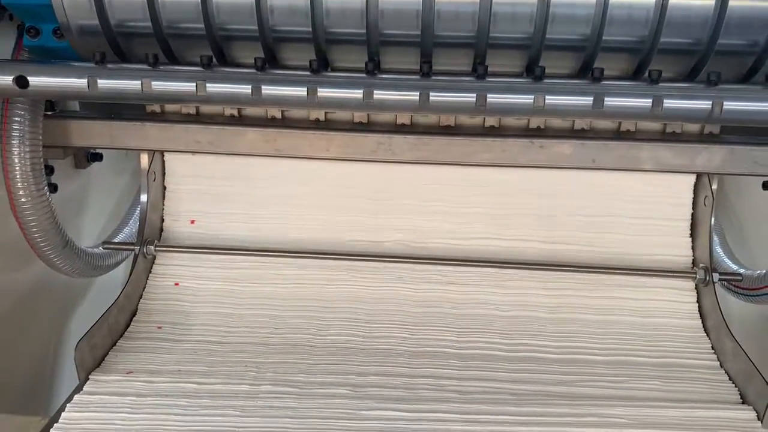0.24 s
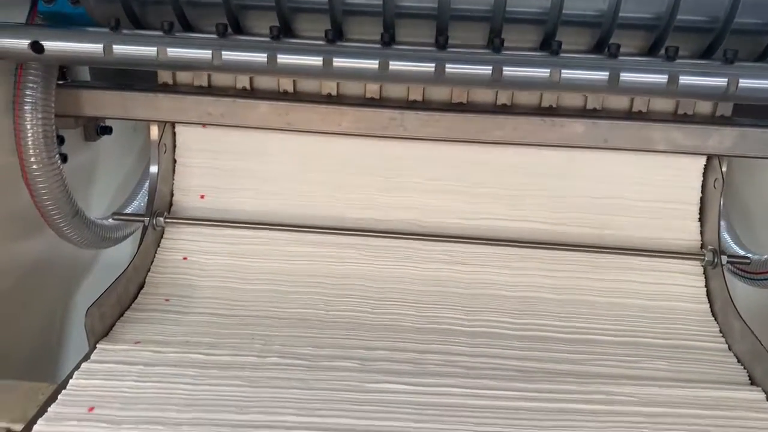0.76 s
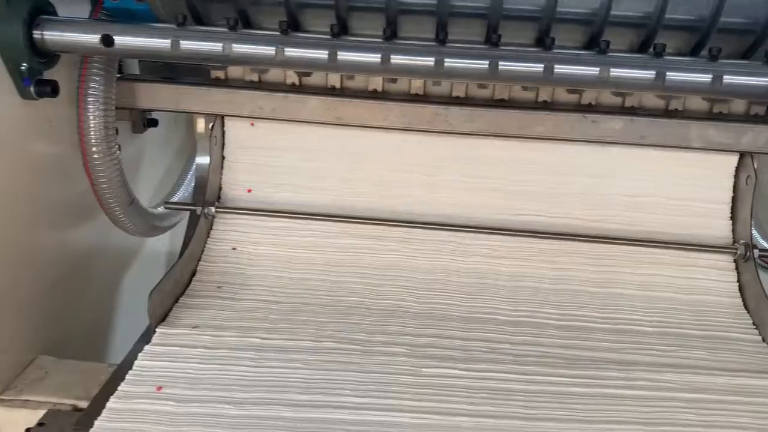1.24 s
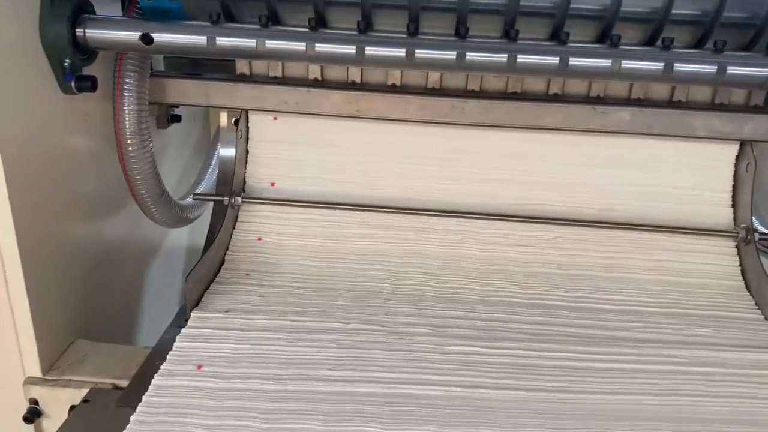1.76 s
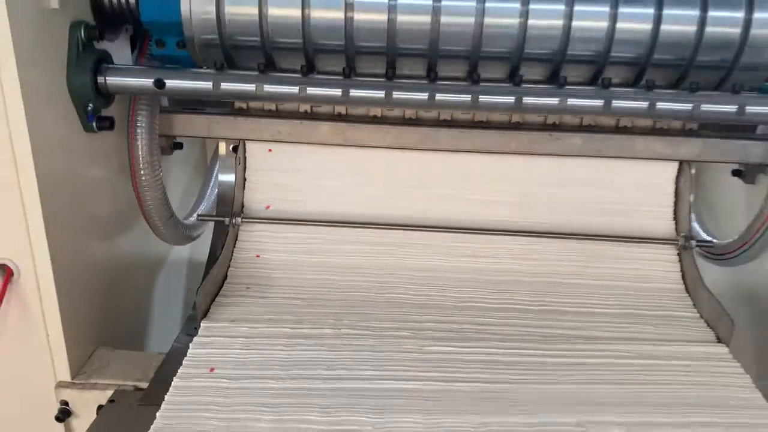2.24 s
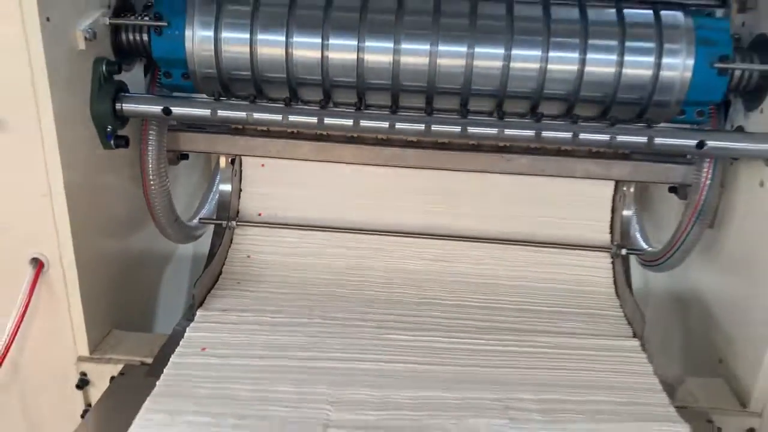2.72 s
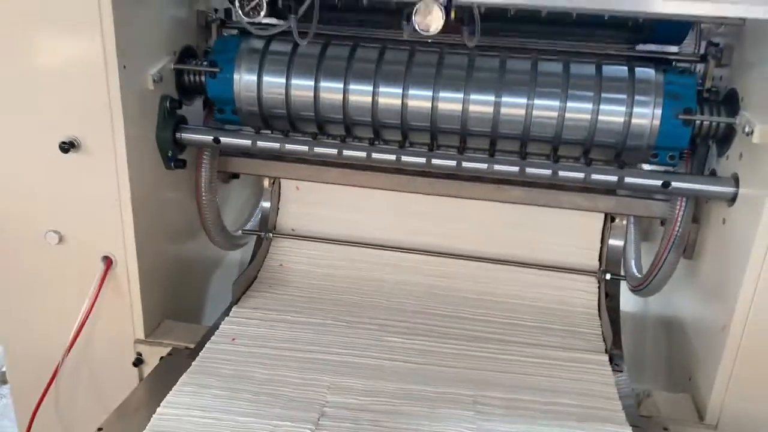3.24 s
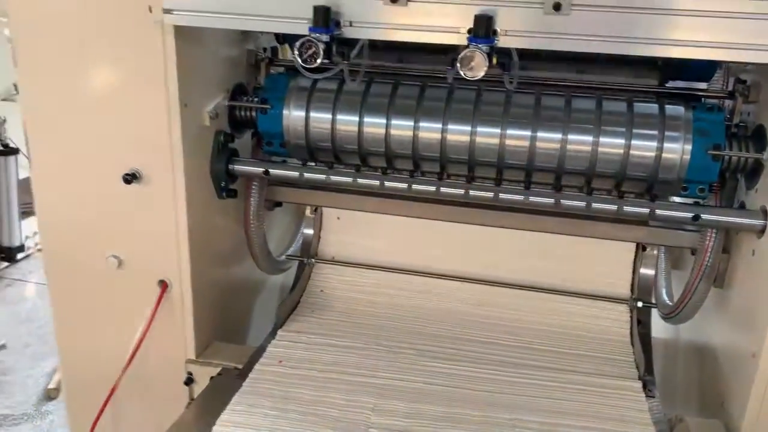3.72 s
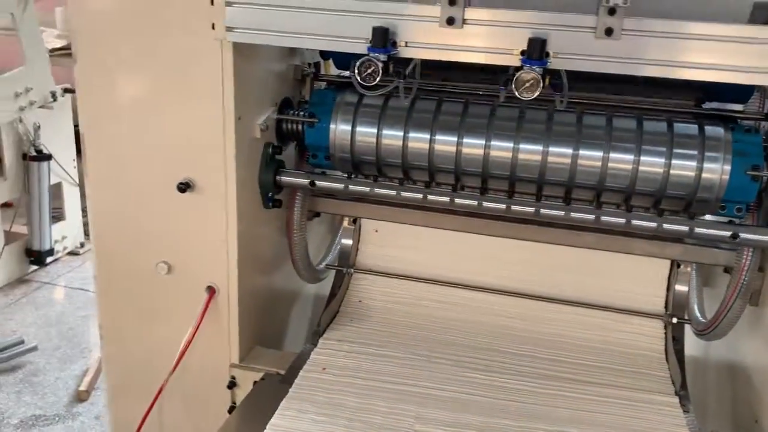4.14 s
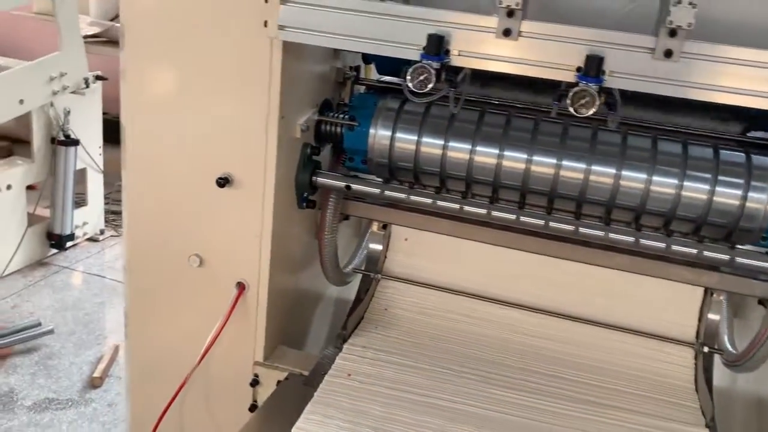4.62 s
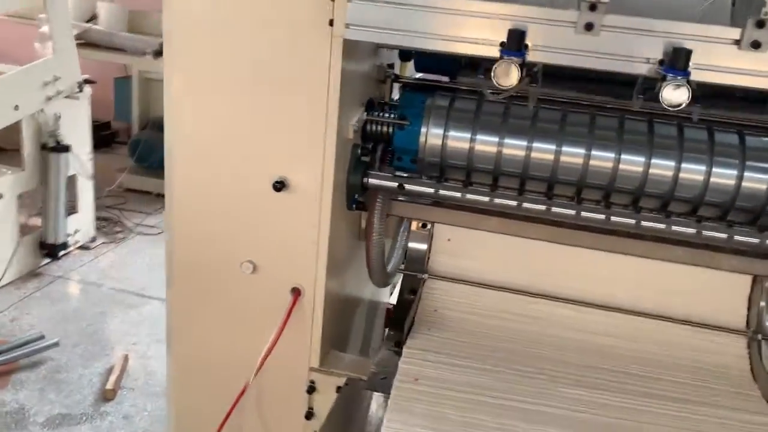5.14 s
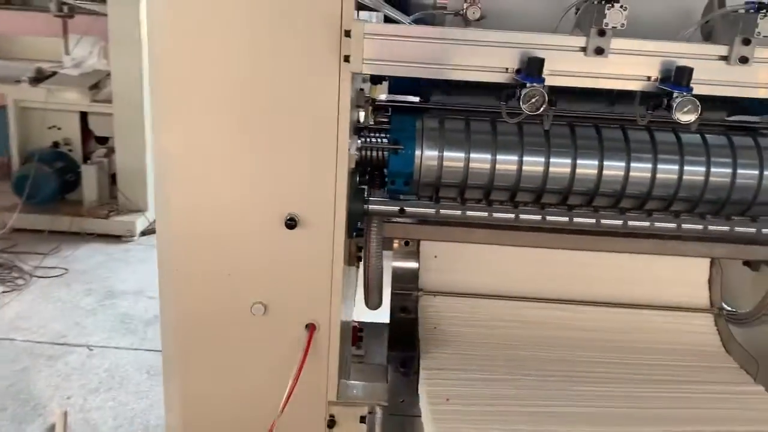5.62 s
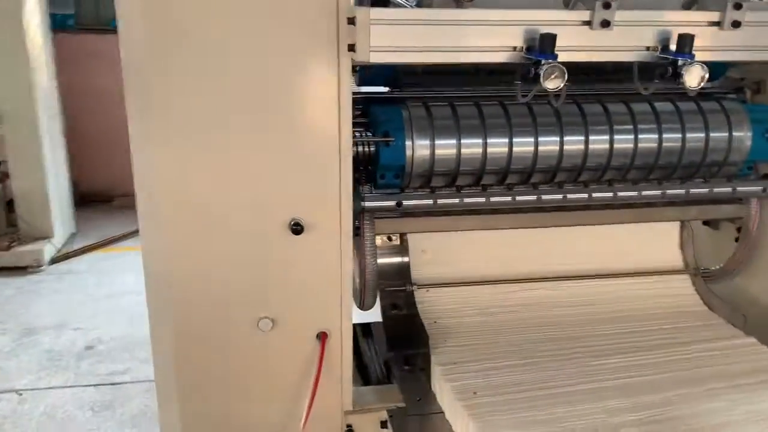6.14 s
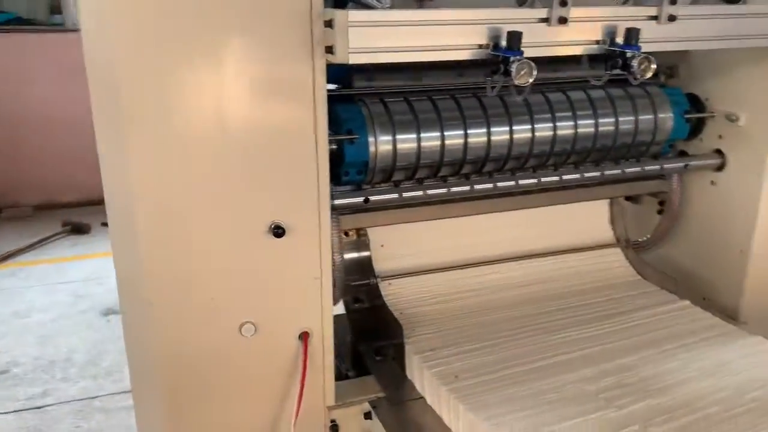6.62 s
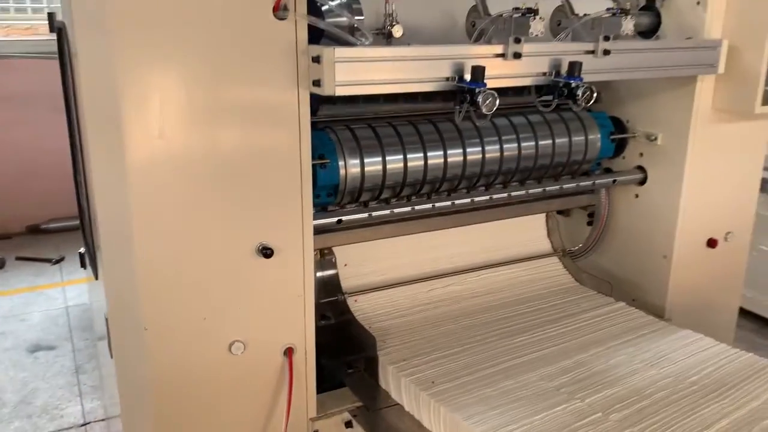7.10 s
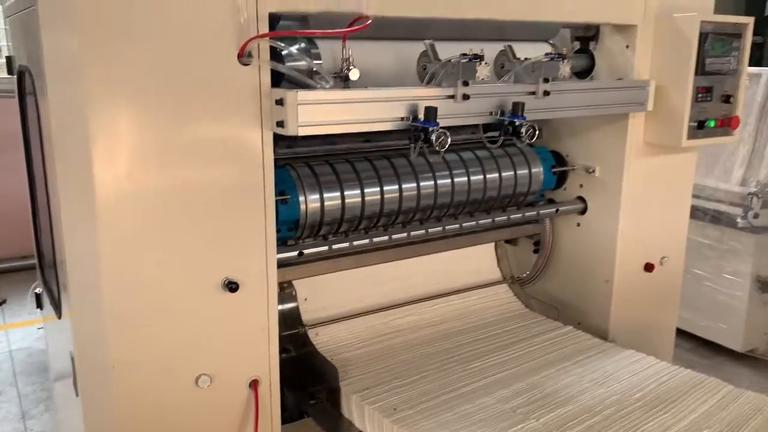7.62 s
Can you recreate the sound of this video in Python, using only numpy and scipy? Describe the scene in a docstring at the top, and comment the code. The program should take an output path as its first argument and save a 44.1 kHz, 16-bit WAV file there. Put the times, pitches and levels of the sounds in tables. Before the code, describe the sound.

A paper-folding machine clatters at nine beats a second, each fold a low thump and airy pop, over a pump drone, slowly receding.

```python
"""Paper towel folder, backing away

A folding machine runs at nine folds a second in a hard-walled workshop; the stereo listener backs away from it.
Each fold thumps the frame (gliding sine blows into resonators), and a suction valve pops (likewise)
with a puff of air (shaped noise); one of three blades clinks (struck modes).
Loose parts knock and sheets snap over a pump drone (sines), panel rumble, gear clatter and paper rush (noise).
"""
import sys
import numpy as np
from scipy import signal
from scipy.fft import rfft, irfft
from scipy.io import wavfile
from scipy.ndimage import uniform_filter1d

SR = 44100
rng = np.random.default_rng(int(sys.argv[2]) if len(sys.argv) > 2 else 0)


def wrap_up_sound(samples):
    """Save the sound to the file named by the first command line argument, as 16-bit audio."""
    columns = np.atleast_2d(samples).T
    # keep every value between -1 and 1, then stretch to whole-number steps
    tamed = np.clip(columns, -1, 1)
    steps = np.round(tamed * 32767).astype(np.int16)
    wavfile.write(sys.argv[1], SR, steps)


N = 346626
TIME = np.arange(N) / SR
HZ = np.fft.rfftfreq(N, 1 / SR)

# All levels are relative: each source sets its own gain on top.
# Place: reverberation of the workshop: f/Hz, t60/s
ROOM_T60 = [(100, 0.13), (1000, 0.071), (4000, 0.15), (10000, 0.055)]
# Distance, as the listener backs away: t/s, frame level/dB, gear clatter level/dB, paper and air level/dB,
# valve level/dB
DISTANCE = [(0.4, -16, -26.5, -34.7, 0), (1.8, -16.2, -27.2, -36.5, -.5), (3, -17.8, -27.6, -41, -4.5),
            (4.4, -19, -28, -42.3, -6), (5.7, -20, -26.7, -41, -7), (6.5, -22.5, -27.7, -41, -7.5),
            (7.8, -24, -28.5, -42, -9)]
# Stereo image: likeness of left and right by frequency, negative where opposite: f/Hz, share (clipped to +-1)
STEREO_LIKENESS = [(60, 0.92), (300, 0.85), (550, 0.3), (850, -0.41), (1100, 0.099), (1600, 0.15),
                   (2300, 0.71), (3100, -0.44), (4300, 0.42), (5600, -0.43), (6400, 0.26), (7400, -1.09),
                   (8900, 1), (9900, 0.65), (10800, -1.02)]
# Microphones: left over right: f/Hz, level/dB
LEFT_OVER_RIGHT = [(300, 0.5), (650, -3), (1400, -3), (2600, -1), (5000, -4), (9000, 1)]

# Pump's strongest tones, swelling in the room's standing waves:
# t/s, 4th order level/dB, 7th order level/dB, 10th order level/dB
PUMP_TONES = [(0.2, -43, -48, -58), (2.4, -43, -43, -54), (3.1, -31.5, -31.5, -50), (4.6, -29, -36, -49),
              (5.3, -29, -43, -38), (6.1, -35, -37, -40.5), (7, -35, -34, -47)]
# Pump's whine, its 13th order, which comes and goes: t/s, level/dB
PUMP_WHINE = [(0.2, -47), (1.4, -50), (2.6, -55), (3.05, -43), (4.2, -56), (5, -38), (5.3, -53),
              (5.7, -36.5), (6.3, -53), (6.8, -40), (7.5, -50)]
# Pump's weaker tones: multiple of the pump rate, level/dB
PUMP_ORDERS = [(2, -35), (6, -46), (8, -47), (9, -47), (12, -48)]

# Noise spectrum of the shuddering panels: f/Hz, level/dB per Hz
RUMBLE_SPECTRUM = [(15, -16), (35, -43), (55, -21), (105, -4), (145, -5), (185, -1), (260, -12),
                   (305, -2.5), (360, -21), (450, -21.5), (700, -37), (2000, -40)]
# Noise spectrum of paper on the rollers: f/Hz, level/dB per Hz
PAPER_SPECTRUM = [(1000, -1), (2500, 13.5), (3500, -11), (4400, 8), (5600, 3), (6500, 3.5), (7500, 1),
                  (8400, 1.5), (10000, -1), (11000, 4.5)]
# Noise spectrum of air from the suction holes: f/Hz, level/dB per Hz
AIR_SPECTRUM = [(800, -2), (2500, 3), (4400, 0.5), (5600, -9.5), (6500, -9.5), (7500, -7.5), (8400, -3),
                (10000, -4.5), (11000, -4)]
# Noise spectrum of gears and bearings: f/Hz, level/dB per Hz
CLATTER_SPECTRUM = [(150, 7), (400, 6.5), (480, -0.5), (555, 8.5), (680, 0), (850, -1), (1050, -2.5),
                    (1450, -6), (1800, -9), (2300, -10.5), (2680, -5.5), (2900, -8.5), (3150, -9.5),
                    (4500, -21), (9000, -44.5)]

# Sheets that snap taut: t/s, level/dB
SNAPS = [(0.502, -24), (0.56, -39), (0.845, -18.5), (2.455, -26), (2.562, -26), (2.788, -29),
         (3.871, -22.5)]
# Loudest knocks of loose parts: t/s, level/dB, strongest around f/Hz, chatter decay t/s
KNOCKS = [(0.526, -2, 720, .005), (0.859, -6.5, 850, .005), (1.167, -7, 560, .003), (1.287, -12, 1000, .01),
          (1.301, -8, 1100, .0054), (2.397, -12, 900, .0043), (2.494, -16, 1200, .0069),
          (3.186, -10, 1350, .004), (3.873, -7, 1300, .003), (4.196, -7, 900, .002),
          (4.863, -11, 850, .002), (5.33, -2, 580, .002), (5.534, -12, 800, .0045), (5.755, -9, 850, .002),
          (5.86, -13, 1350, .006), (6.194, -13, 1300, .005), (6.211, -7, 1650, .006)]
# Modes of the loose parts: f/Hz, level/dB, t60/s
PART_MODES = [(560, -1, .025), (660, -2, .02), (780, -1, .02), (950, -2, .018), (1100, -2, .015),
              (1290, 0, .015), (1480, 0, .015), (1680, -1, .012), (2280, -4, .01), (3300, -11, .01),
              (4400, -14, .01)]

# Strikes of the two harder-set blades: t/s, level/dB
HARD_BLADE_STRIKES = [(0.005, -14.5), (0.118, -14.5), (0.340, -23), (0.453, -12), (0.675, -20),
                      (0.784, -14.5), (1.009, -18), (1.118, -14.5), (1.343, -18), (1.456, -15.5),
                      (1.679, -24), (1.791, -15), (2.015, -18), (2.125, -14.5), (2.347, -24), (2.462, -17),
                      (2.684, -17), (2.795, -12.5), (3.021, -19.5), (3.133, -14), (3.356, -19),
                      (3.464, -15.5), (3.696, -21), (3.8, -18.5), (4.021, -23), (4.135, -14.5), (4.36, -19),
                      (4.470, -14), (4.695, -17.5), (4.805, -13.5), (5.028, -20.5), (5.143, -16),
                      (5.366, -19), (5.476, -16.5), (5.696, -19), (5.811, -10.5), (6.033, -17.5),
                      (6.145, -16), (6.37, -28), (6.479, -17), (6.815, -20.5), (7.15, -20), (7.378, -26),
                      (7.485, -20.5), (7.822, -23)]
# Softest blade, clearest from beside the roller until the side cover hides it: t/s, level/dB
SOFT_BLADE = [(2.5, -28.5), (4.4, -30), (5.9, -31.5), (6.5, -49), (7.6, -45)]
# Modes of a blade, main ring first: f/Hz, level/dB, t60/s
BLADE_MODES = [(2665, 0, .021), (2270, 0, .018), (2420, 1.5, .018), (2560, -2, .018), (2790, -2, .018),
               (2895, -9, .04), (3350, -6, .012), (3800, -6, .012), (4350, -8, .01)]
# A blade's strike and rebounds: delay t/s, level/dB
REBOUNDS = [(0, 0), (.003, -4), (.008, -13)]

# Folding arms' blows within a fold:
# delay t/s, level/dB, starting f/Hz, final f/Hz, time of the pitch fall t/s, time to the peak t/s
ARM_BLOWS = [(-.002, -18, 440, 360, .004, .0028), (-.002, -8, 518, 162, .0026, .007),
             (.0288, -17, 210, 190, .005, .003)]
# Suction valve's click, then its pop:
# delay t/s, level/dB, starting f/Hz, final f/Hz, time of the pitch fall t/s, time to the peak t/s
VALVE_BLOWS = [(.0531, -18, 600, 150, .0026, .009), (.0647, -9, 120, 83, .0026, .0052)]
# Resonances of the frame: f/Hz, width f/Hz, level/dB
FRAME_MODES = [(54.4, 8.3, -5), (138.6, 8.6, 10), (209, 16, -4.4), (309.3, 38.6, 7.5), (422, 8.4, 7)]

FOLD_HZ, FIRST_FOLD_S = 8.96, .0437
HUNT_S, HUNT_HZ = .0006, .578  # the drive hunts: folds come slightly early and late
BLADES = 3  # blades on the cutting roller, one for each fold, set unequally hard
POP_DELAY_S, BLADE_DELAY_S = .0675, .0725  # after the start of a fold
THUMP_VARY_DB, POP_VARY_DB, BLADE_VARY_DB = .4, 1, 1  # scatter from fold to fold
PLAY_S = .00015  # timing scatter of each blow
FRAME_LAG_S = .00034  # the frame reaches the left microphone later
PUMP_HZ = 77.62
PUMP_FADE_DB, PUMP_FLUTTER_DB, PUMP_FLUTTER_HZ = 2.5, 1.6, 4
# A lighter knock once in each turn of the roller
RATTLE_DELAY_S, RATTLE_SCATTER_S, RATTLE_DB, RATTLE_VARY_DB = .137, .008, -19, 2
RATTLE_HZ, RATTLE_CHATTER_S = 1100, .0066
KNOCK_FOCUS_DB = -8  # a mode one octave off the knock's strongest pitch
EDGE_HZ = 10900  # upper band limit


def amp(db):
    """Decibels to gain."""
    return 10 ** (np.asarray(db) / 20)


def unit(x):
    """Scales to an rms of 1."""
    return x / np.sqrt(np.mean(x ** 2) + 1e-20)


def read(points, hz):
    """A spectrum joined by straight lines on a log-frequency axis."""
    f, value = np.transpose(points)
    return np.interp(np.log(hz + 1), np.log(f), value)


def curves(rows):
    """Every column of a timed table, sample by sample."""
    s, *columns = np.transpose(rows)
    return [np.interp(TIME, s, c) for c in columns]


def add(mix, s, sound):
    """Mixes a sound in at the given time."""
    part = mix[..., max(round(s * SR), 0):][..., :sound.shape[-1]]
    part += sound[..., :part.shape[-1]]


def wander(hz):
    """Slow random drift of unit rms, up to about the given rate."""
    return unit(irfft(rfft(rng.standard_normal(N)) / (1 + (HZ / hz) ** 4), N))


def frame_db(falloff):
    """Level of a frame sound as the listener backs away, 0 dB at the nearest."""
    near = curves(DISTANCE)[0]
    return falloff * (near - near.max())


def spread(pair):
    """Gives two unrelated signals the set left-right likeness at each frequency."""
    a, b = rfft(pair)
    same = np.clip(read(STEREO_LIKENESS, HZ), -1, 1)
    right = same * a + np.sqrt(1 - same ** 2) * b
    return irfft(np.array([a, right]), N)


def colour(pair, spectrum, patchy_db):
    """Gives a stereo pair its spectrum, with brief patches that come and go."""
    hz, _, z = signal.stft(spread(pair), SR, nperseg=1024, noverlap=768)
    patches = uniform_filter1d(rng.standard_normal(z.shape[1:]), size=7, axis=0)  # across frequency
    patches = unit(uniform_filter1d(patches, size=4, axis=1))  # across time
    z = z * amp(read(spectrum, hz)[:, None] + patchy_db * patches)
    return unit(signal.istft(z, SR, nperseg=1024, noverlap=768)[1][:, :N])


def noise(spectrum, patchy_db):
    """Stereo noise of the given spectrum."""
    return colour(rng.standard_normal((2, N)), spectrum, patchy_db)


def folds():
    """The start of every fold (s), swinging with the drive."""
    even = np.arange(FIRST_FOLD_S, N / SR, 1 / FOLD_HZ)
    return even + HUNT_S * np.cos(2 * np.pi * HUNT_HZ * (even - FIRST_FOLD_S))


def each_fold(delay, rise, fall, vary_db):
    """An envelope that swells and dies once in every fold (times in s)."""
    t, out = np.arange(SR // 5) / SR, np.zeros(N)
    shape = (1 - np.exp(-(t / rise) ** 2)) * np.exp(-t / fall)
    shape = shape / shape.max()
    for s in folds():
        add(out, s + delay, amp(vary_db * rng.standard_normal()) * shape)
    return out


def ring(modes, contact, onset_s=.00088):
    """A contact rings a set of decaying modes; its loudest moment has a short-term rms of 1."""
    t = np.arange(SR // 10) / SR
    hz, db, t60 = np.transpose(modes)[:, :, None]
    phase = rng.random(hz.shape)
    body = (amp(db - 60 * t / t60) * np.sin(2 * np.pi * (hz * t + phase))).sum(0)
    body *= 1 - np.exp(-t / onset_s)
    out = signal.fftconvolve(contact, body[None], axes=1)[:, :len(t)]
    loudest = uniform_filter1d(out ** 2, size=256, axis=1).max(1, keepdims=True)
    return out / np.sqrt(loudest)


def room(x):
    """Workshop walls return sparse reflections, each band dying at its own speed."""
    taps = rng.choice([-1., 1.], (2, SR // 2))
    taps *= rng.random((2, SR // 2)) < 2500 / SR  # about 2500 reflections a second
    taps[:, :round(.004 * SR)] = 0  # gap before the first one
    hz, t, z = signal.stft(taps, SR, nperseg=256)
    tail = signal.istft(z * amp(-60 * t / read(ROOM_T60, hz)[:, None]), SR)[1]
    return signal.fftconvolve(x, tail / np.linalg.norm(tail[0]), axes=1)[:, :N]


def pump(port_turns=.05):
    """The vacuum pump drones in multiples of its rate; each tone flutters on its own as the listener moves."""
    turns = np.cumsum(PUMP_HZ + .04 * wander(1) + .12 * wander(6)) / SR
    tones = list(zip((4, 7, 10, 13), curves(PUMP_TONES) + curves(PUMP_WHINE)))
    tones += [(k, db + PUMP_FADE_DB * wander(1.0)) for k, db in PUMP_ORDERS]
    out = np.zeros((2, N))
    for k, db in tones:
        # the phase drifts oppositely on the left and right
        apart = port_turns * k / 10 * wander(.11) * np.array([[-.5], [.5]])
        level = np.sqrt(2) * amp(db + PUMP_FLUTTER_DB * wander(PUMP_FLUTTER_HZ))
        out += level * np.sin(2 * np.pi * (k * turns + rng.random() + apart))
    return out


def rumble(rumble_db=-24.5, falloff=.65):
    """Side panels shudder after each thump: low noise swelling over a steady floor."""
    shudder = 1.8 + each_fold(delay=0., rise=.002, fall=.016, vary_db=.5)
    panels = unit(noise(RUMBLE_SPECTRUM, patchy_db=2.0) * shudder)
    return amp(frame_db(falloff) + rumble_db) * panels


def paper_and_air(paper_db=7.5, air_db=2.0, steady=1.7):
    """Paper slides and flaps over the rollers; the suction holes puff as they let a sheet go."""
    feed = each_fold(delay=-.005, rise=.008, fall=.024, vary_db=1)
    release = each_fold(delay=POP_DELAY_S - .012, rise=.012, fall=.012, vary_db=.8)
    peel = each_fold(delay=POP_DELAY_S, rise=.007, fall=.006, vary_db=1)
    paper = amp(paper_db) * unit(noise(PAPER_SPECTRUM, patchy_db=4.0) * (steady + feed))
    air = amp(air_db) * unit(noise(AIR_SPECTRUM, patchy_db=2.5) * (release + .5 * peel))
    return amp(curves(DISTANCE)[2]) * (paper + air)


def clatter(clatter_db=7.0, per_s=800, size_db=1.0, rush=.39, steady=4):
    """Gears and bearings tick densely, hardest while the arms swing back."""
    size = amp(size_db * np.minimum(rng.exponential(1, N), np.pi))
    ticks = size * (rng.random(N) < per_s / SR) * rng.choice([-1, 1], (2, N))
    drive = ticks + rush * rng.standard_normal((2, N))
    load = steady + each_fold(delay=.0011, rise=.0049, fall=.013, vary_db=5.5)
    return amp(curves(DISTANCE)[1] + clatter_db) * colour(drive * load, CLATTER_SPECTRUM, patchy_db=3.0)


def snaps(snap_db=0, fall_s=.013):
    """Now and then a sheet snaps taut: a short, bright burst of paper noise."""
    t, burst = np.arange(SR // 10) / SR, np.zeros(N)
    for s, db in SNAPS:
        add(burst, s, amp(db + snap_db) * np.exp(-t / fall_s))
    return burst * noise(PAPER_SPECTRUM, patchy_db=3)


def knocks(knock_db=-10.5):
    """Loose parts rattle with each turn of the roller and sometimes knock hard, some dull and some bright."""
    out, t = np.zeros((2, N)), np.arange(SR // 10) / SR
    rattles = []
    for s in folds()[::BLADES]:
        at = s + rng.normal(RATTLE_DELAY_S, RATTLE_SCATTER_S)
        db = RATTLE_DB + RATTLE_VARY_DB * rng.standard_normal()
        rattles.append((at, db, RATTLE_HZ, RATTLE_CHATTER_S))
    for s, db, centre, chatter in KNOCKS + rattles:
        modes = [(hz, level + KNOCK_FOCUS_DB * np.log2(hz / centre) ** 2, t60)
                 for hz, level, t60 in PART_MODES]
        contact = rng.standard_normal((2, len(t))) * np.exp(-t / chatter)
        add(out, s - .001, amp(db + knock_db) * ring(modes, contact))
    return out


def clink(side_db, scrape_db=-25, scrape_s=.012):
    """A blade strikes, scrapes and rebounds; side_db sets its side modes against its main ring."""
    t = np.arange(SR // 20) / SR
    contact = amp(scrape_db) * rng.standard_normal((2, len(t))) * np.exp(-t / scrape_s)
    for delay, db in REBOUNDS:
        at = delay * rng.uniform(.8, 1.2) + rng.uniform(0, .00015, 2)  # one time for each side
        contact[[0, 1], np.round(at * SR).astype(int)] += amp(db)
    modes = [(hz, db + side_db * (k > 0) + 2 * rng.standard_normal(), t60)
             for k, (hz, db, t60) in enumerate(BLADE_MODES)]
    return ring(modes, contact, onset_s=.0022)


def blade(hard_db=-5.8, side_falloff=1.1):
    """The three blades take turns to meet the anvil; from afar their main ring stands out."""
    out, side = np.zeros((2, N)), frame_db(side_falloff)
    strikes = [(s, db + hard_db) for s, db in HARD_BLADE_STRIKES]
    for s in folds()[1::BLADES]:
        soft_db = np.interp(s, *np.transpose(SOFT_BLADE)) + BLADE_VARY_DB * rng.standard_normal()
        strikes.append((s + BLADE_DELAY_S, soft_db))
    for s, db in strikes:
        add(out, s, amp(db) * clink(np.interp(s, TIME, side)))
    return out


def bend(start_hz, end_hz, sag_s, peak_s):
    """A blow on steel: fast bending waves arrive first, so the pitch falls as the thud swells and dies."""
    t = np.arange(SR // 10) / SR
    turns = end_hz * t + (start_hz - end_hz) * sag_s * (1 - np.exp(-t / sag_s))
    swell = (t / peak_s * np.exp(1 - t / peak_s)) ** 2
    return -swell * np.sin(2 * np.pi * turns)


def thumps(thump_db=0., valve_db=0., thump_falloff=.96, valve_falloff=1.2):
    """The arms, with a little play, and the valve strike the frame, which hums on from fold to fold."""
    force = np.zeros(N)
    arm_level = thump_db + frame_db(thump_falloff)
    valve_level = valve_db + valve_falloff * curves(DISTANCE)[3]
    parts = [(ARM_BLOWS, arm_level, THUMP_VARY_DB), (VALVE_BLOWS, valve_level, POP_VARY_DB)]
    for blows, level, vary_db in parts:
        for s, near in zip(folds(), np.interp(folds(), TIME, level)):
            for delay, db, *shape in blows:
                late, hard = rng.standard_normal(2) * [PLAY_S, vary_db]
                add(force, s + delay + late, amp(near + db + hard) * bend(*shape))
    hum = sum(amp(db) * signal.lfilter(*signal.iirpeak(hz, hz / width, SR), force)
              for hz, width, db in FRAME_MODES)
    return force + hum


def scene(blade_wet_db=-8, knock_wet_db=-7):
    """The machine, with the workshop answering its metal hits; the frame reaches the left microphone late."""
    cuts, hits = blade(), knocks()
    echoes = room(amp(blade_wet_db) * cuts + amp(knock_wet_db) * hits)
    metal = cuts + spread(hits + echoes)
    frame = thumps()
    frame = np.array([np.interp(TIME - FRAME_LAG_S, TIME, frame), frame])
    return pump() + rumble() + paper_and_air() + clatter() + snaps() + metal + frame


def record(dry, low_cut_hz=42):
    """The microphones lose deep bass, the right hears more mid range; peaks round off, then the band limit."""
    tilt = amp(read(LEFT_OVER_RIGHT, HZ) * np.array([[.5], [-.5]]))
    low_cut = (HZ / low_cut_hz) ** 3 / np.sqrt(1 + (HZ / low_cut_hz) ** 6)
    heard = irfft(rfft(dry) * tilt * low_cut, N)
    heard = heard / (1 + (heard / .93) ** 8) ** (1 / 8)  # soft ceiling
    band = signal.firwin(301, EDGE_HZ, window=("kaiser", 9), fs=SR)
    return signal.oaconvolve(heard, band[None], "same")


dry = scene()
out = record(dry)
wrap_up_sound(out)
```